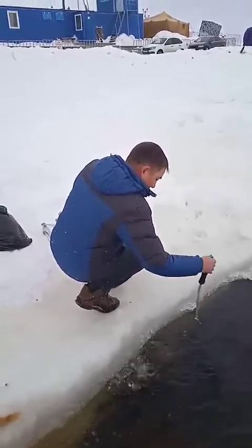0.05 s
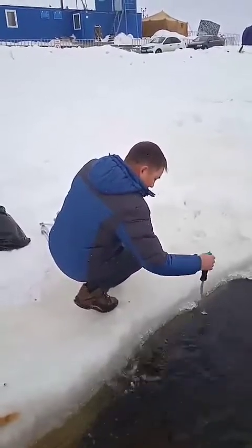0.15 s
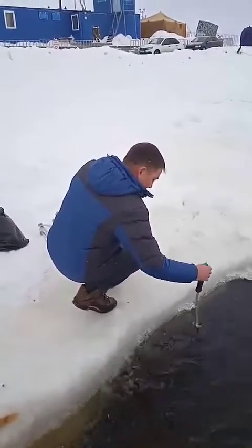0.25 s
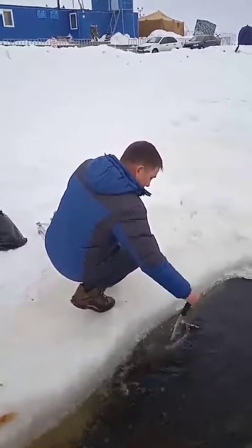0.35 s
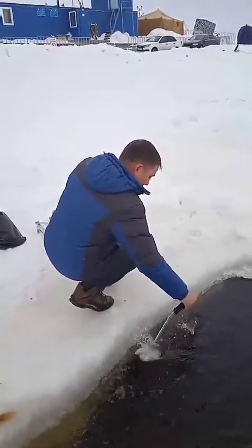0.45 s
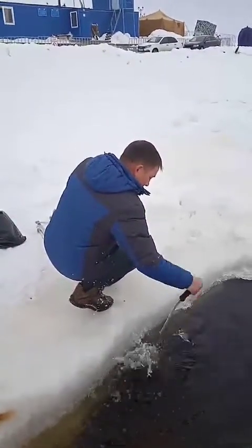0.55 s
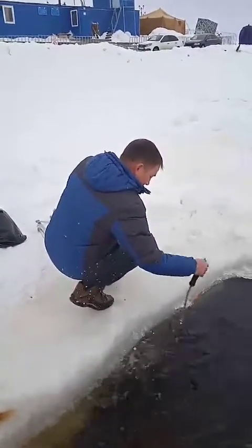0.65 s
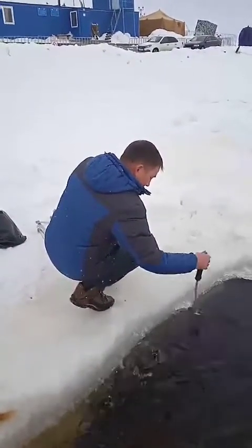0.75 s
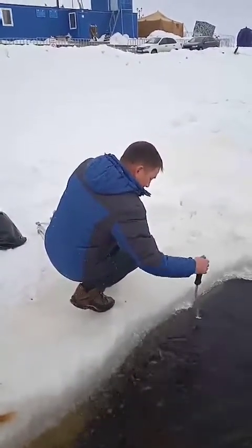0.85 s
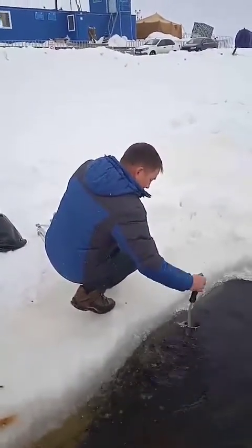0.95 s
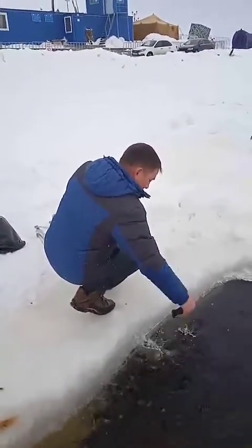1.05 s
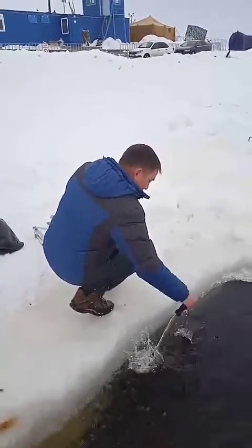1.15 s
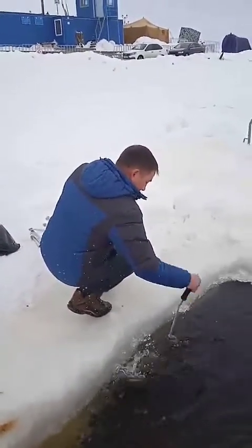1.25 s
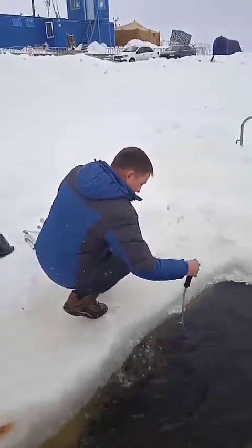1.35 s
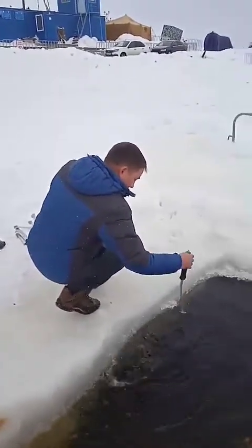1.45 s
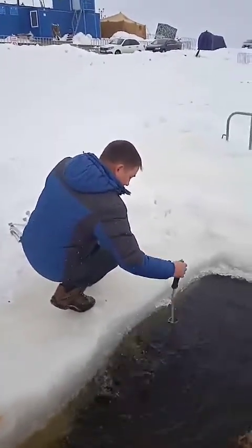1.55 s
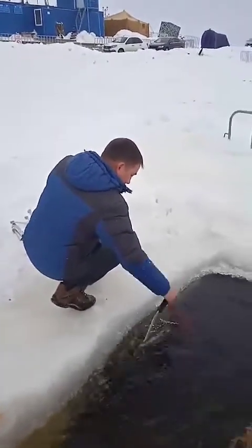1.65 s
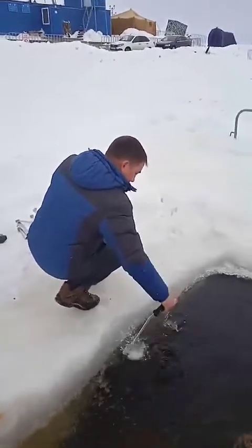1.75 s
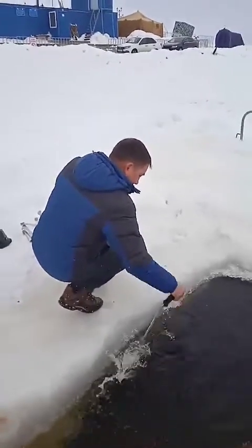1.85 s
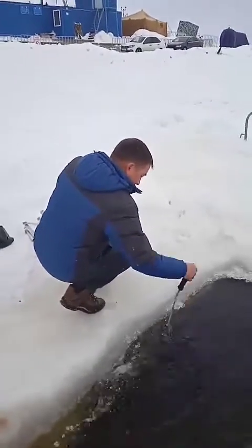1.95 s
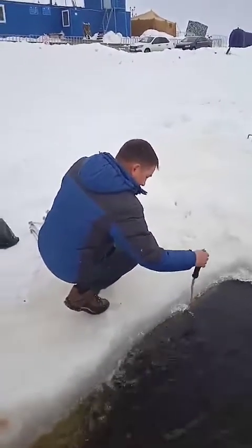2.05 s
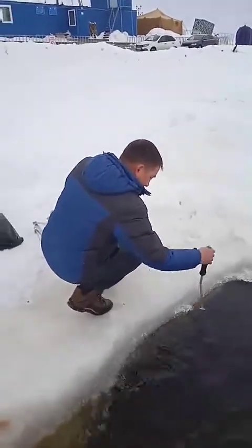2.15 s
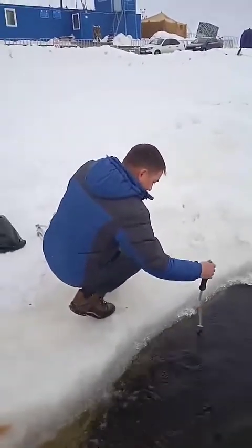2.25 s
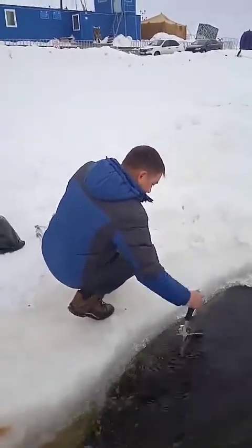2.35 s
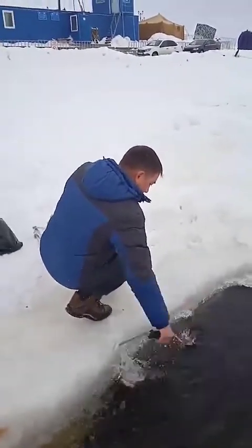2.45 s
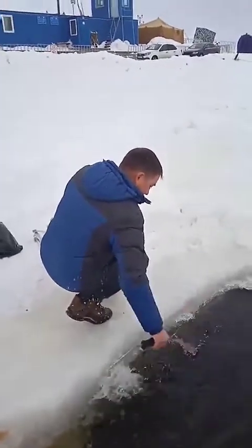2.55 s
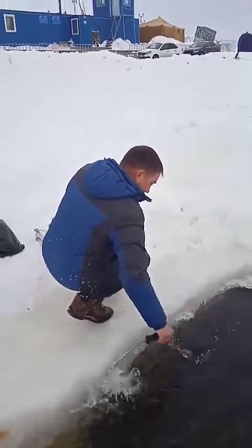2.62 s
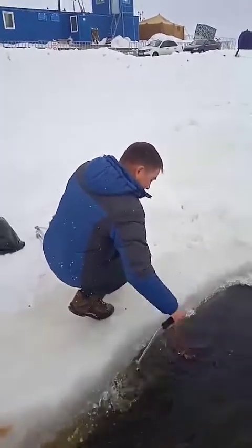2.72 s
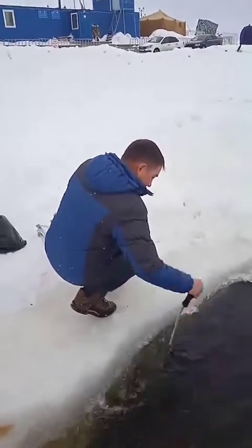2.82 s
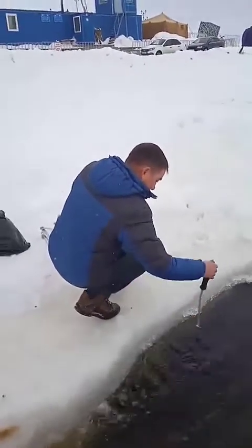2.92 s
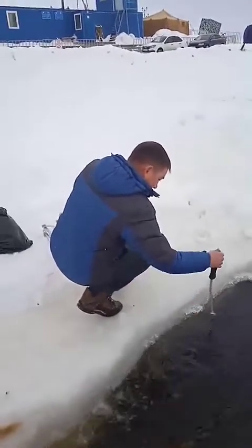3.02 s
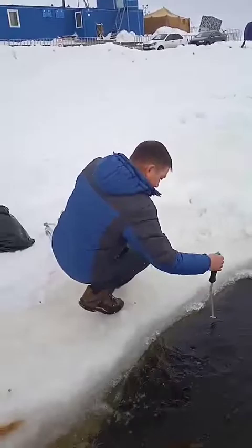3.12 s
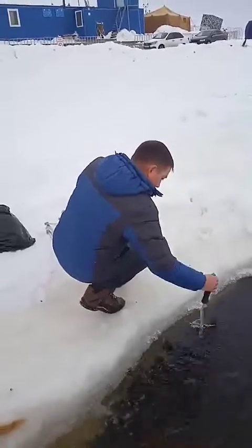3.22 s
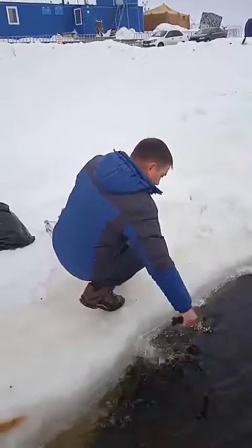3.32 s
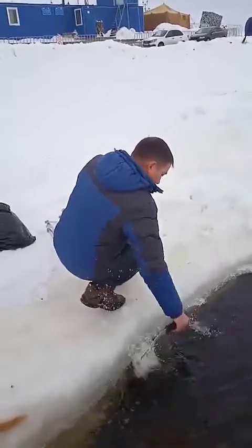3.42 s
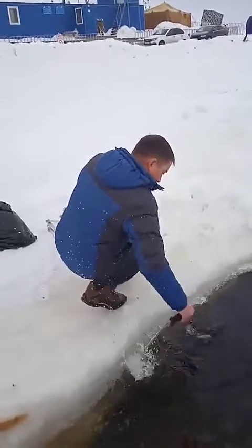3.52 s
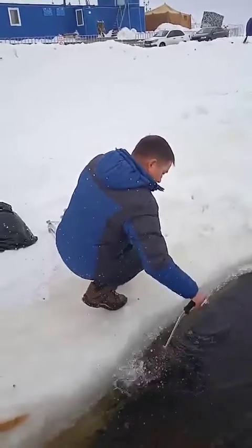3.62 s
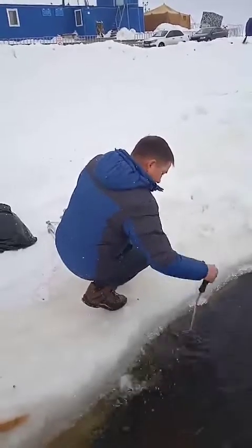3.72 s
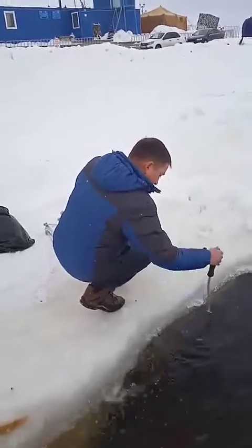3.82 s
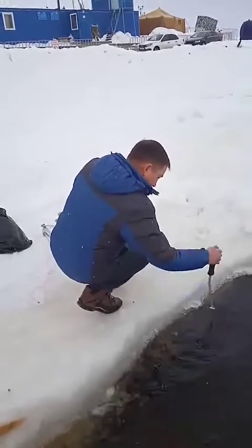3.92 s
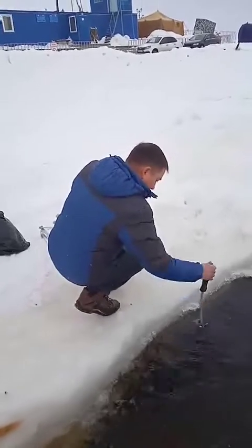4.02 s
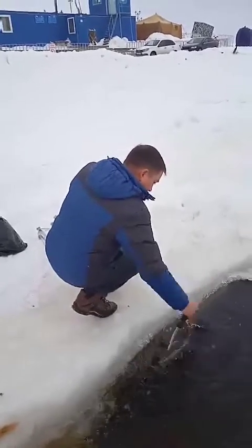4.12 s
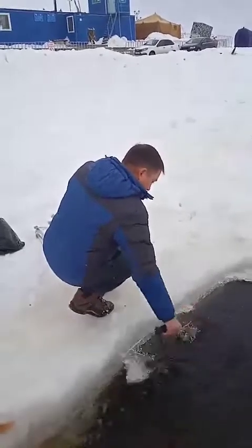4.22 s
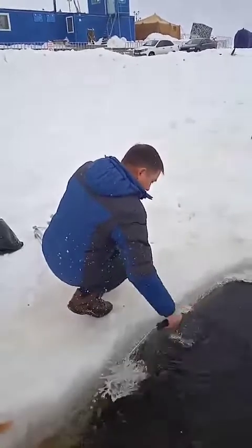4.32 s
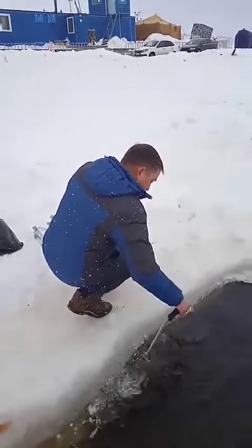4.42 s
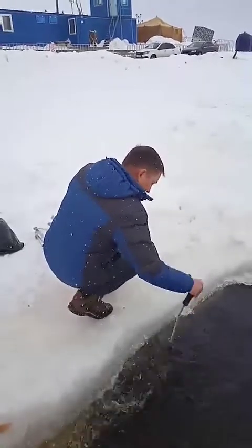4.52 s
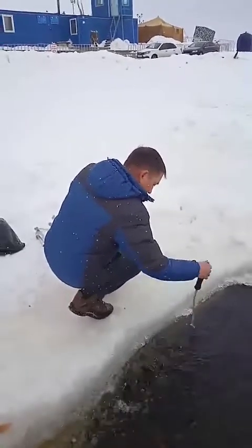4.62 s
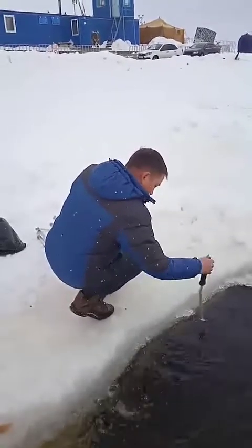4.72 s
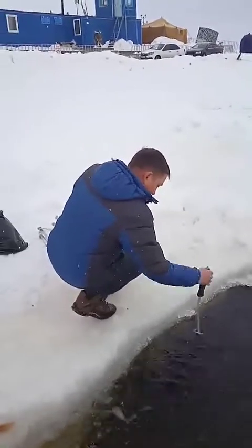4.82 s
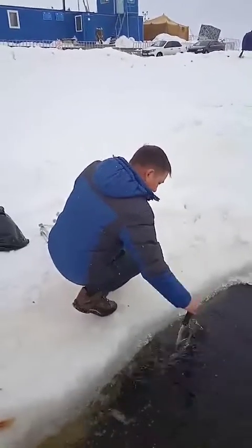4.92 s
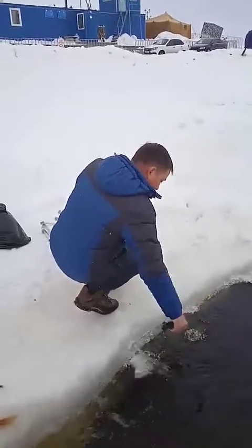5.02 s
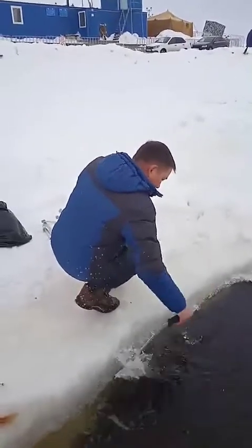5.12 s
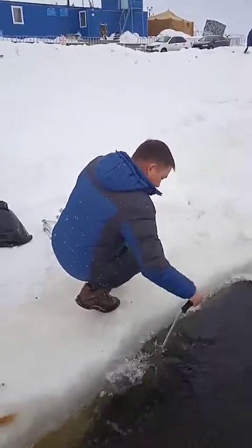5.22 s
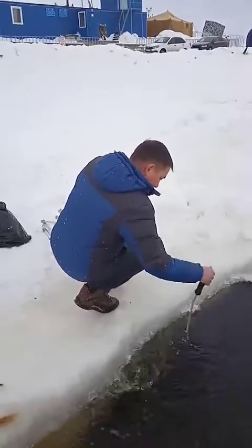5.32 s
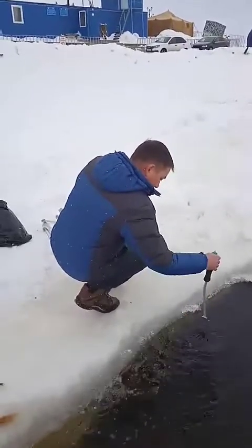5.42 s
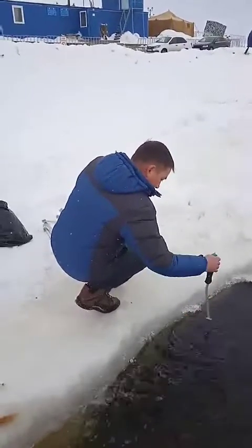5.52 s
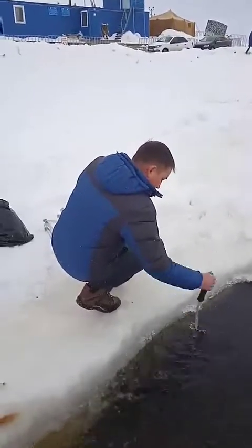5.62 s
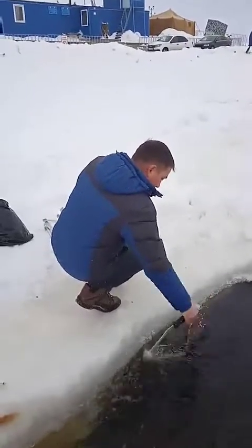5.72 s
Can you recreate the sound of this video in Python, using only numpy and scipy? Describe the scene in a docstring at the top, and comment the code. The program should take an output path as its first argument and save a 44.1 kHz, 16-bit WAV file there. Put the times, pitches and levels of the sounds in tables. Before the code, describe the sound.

Repeated short splashes and bubbling plops from a rod striking water, each followed by falling droplets, under growing wind rumble.

```python
"""Open water beside a snowy bank, one microphone out in the wind, a faint whir far off.
Spray is already pattering down when a metal rod whips through the water, the first of seven strokes.
Each slaps the surface and drags down a pocket of air, which pinches off and rings as a low, rising plop.
A third of a second later the thrown spray falls back as ticks and tiny ringing bubbles.
Toward the end the wind freshens and buffets the microphone harder."""
import sys
import numpy as np
from scipy import signal
from scipy.fft import rfft, irfft, next_fast_len
from scipy.io import wavfile
from scipy.ndimage import uniform_filter1d

SR = 44100
rng = np.random.default_rng(int(sys.argv[2]) if len(sys.argv) > 2 else 0)


def to_wav(s):
    """Save 16-bit WAV."""
    ch = np.atleast_2d(s).T  # columns
    pcm = np.round(np.clip(ch, -1, 1) * 32767)  # PCM
    wavfile.write(sys.argv[1], SR, pcm.astype(np.int16))


N = 254456
TIME = np.arange(N) / SR


# The bubble trapped by each stroke: (time [s], base pitch [Hz], climb [Hz/s], pitch ceiling [Hz],
# relative level [dB], swell [s], hold [s], decay [s])
TRAPPED_BUBBLES = [(0.4386, 232, 10040, 499, -5.5, 0.0058, 0.011, 0.007),
                   (1.0952, 232, 10700, 488, -11.5, 0.0021, 0.012, 0.0051),
                   (1.7357, 208.3, 7060, 484, -11, 0.0039, 0.023, 0.006),
                   (2.4826, 192, 6530, 349, -12, 0.0002, 0.012, 0.0089),
                   (3.369, 262, 5040, 346, -10.5, 0.00081, 0.012, 0.011),
                   (4.2080, 230.5, 6380, 440, -7.5, 0.0018, 0.021, 0.0051),
                   (5.0243, 225, 7100, 361, -11.5, 0.0035, 0.013, 0.0057)]

def plops(knee_s=0.0026, sag_hz=55, settle_s=0.0073, echo_db=-24, echo_delay_s=0.0132):
    """The big bubble swells into tone, climbs in pitch as it nears the surface, and dies."""
    out = np.zeros(N)
    for s, base_hz, climb, ceiling_hz, db, attack, hold, decay in TRAPPED_BUBBLES:
        age = since(s)
        sag = sag_hz * np.exp(-age / settle_s)  # the first swing is slower while the neck closes
        pitch = np.minimum(base_hz + climb * age, ceiling_hz) - sag
        swell = 1 - np.exp(-(age / attack) ** 1.3)
        past_hold = knee_s * np.logaddexp(0, (np.minimum(age, 1) - hold) / knee_s)
        tone = np.sin(2 * np.pi * np.cumsum(pitch * (age > 0)) / SR)
        out += from_db(db) * swell * np.exp(-past_hold / decay) * tone
    # a weak reflection from the nearby bank beats against the tail
    return out + from_db(echo_db) * np.interp(TIME - echo_delay_s, TIME, out)


# The air pocket shuts: (time [s], relative smack level [dB], neck pitch [Hz],
# relative ring level [dB], overtone gain [dB])
POCKET_CLOSURES = [(.4395, -69.5, 889, -65, -14), (1.097, -60, 915, -55.5, -1.5),
                   (1.735, -42, 889, -55, 3.5), (2.483, -35.5, 695, -46, -8.5),
                   (3.367, -32, 725, -59.5, -8), (4.208, -80, 722, -59.5, 3.5),
                   (5.0221, -32.5, 755, -47, -5.5)]
# Modes of its open neck: (multiple of the neck pitch [ratio], gain [dB])
PIPE_MODES = [(1, 21), (1.78, 15), (2.4, 11)]

def necks(decay_s=0.0077):
    """The neck of the pocket rings briefly, like a short pipe, as it shuts."""
    out = np.zeros(N)
    for s, _, hz, db, overtone_db in POCKET_CLOSURES:
        for k, (multiple, mode_db) in enumerate(PIPE_MODES):
            is_overtone = k > 0
            pitch = hz * multiple * (1 + is_overtone * rng.normal(0, 0.025))
            gain = from_db(db + mode_db + overtone_db * is_overtone)
            out += gain * burst(s, 0.0011, decay_s) * np.sin(2 * np.pi * pitch * since(s))
    return out


# The rod cuts in: (time [s], relative slap level [dB], relative spray level [dB], spray decay [s],
# spray flight [s], relative level of the returning shower [dB])
ROD_STROKES = [(0.4282, -47.5, -56, 0.047, 0.3, -64), (1.083, -51, -51.5, 0.038, .32, -62),
               (1.727, -40.5, -57.5, 0.08, .29, -62), (2.4669, -42, -58, 0.078, 0.33, -56.5),
               (3.3478, -48, -55.5, 0.049, .345, -59.5), (4.1965, -48, -57, 0.053, 0.3, -60.5),
               (5.0048, -53, -48.5, 0.033, 0.35, -59)]
# Tone of the splash at the microphone: (frequency [Hz], relative level [dB])
SPLASH_SPECTRUM = [(200, -5), (600, 3), (1100, -9), (1600, -2), (2500, -2.5), (3500, -18.5), (4600, -9.5),
                   (6800, -8), (8300, -23.5), (11000, -23), (13500, -24.5), (15400, -10.5), (16200, -12.5)]

def splashes(skim_s=0.035, slap_decay_s=0.012, smack_decay_s=0.0052, push_db=-28, push_hz=125):
    """The rod skims, slaps, shoves water aside and throws a sheet of spray; the pocket smacks shut."""
    skim, slap, sheet, push = np.zeros((4, N))
    for s, slap_db, spray_db, spray_decay, *_ in ROD_STROKES:
        skim += from_db(slap_db - 22) * np.exp(-np.minimum(abs(TIME - s), 1) / skim_s)
        slap += from_db(slap_db) * burst(s, 0.0013, slap_decay_s)
        sheet += from_db(spray_db + 8) * burst(s, 0.0064, spray_decay)
        push += burst(s, 0.00049, 0.014) * np.sin(2 * np.pi * push_hz * since(s))
    smack = sum(from_db(db + 1.5) * burst(s, 0.0014, smack_decay_s) for s, db, *_ in POCKET_CLOSURES)
    spray = 0.7 * droplets(per_s=7000, spread_db=3) + 0.85 * fizz(per_s=2000, spread_db=3.5, cycles=40)
    crackle = droplets(per_s=12000, spread_db=2.5)
    hiss = colour((skim + slap + smack) * crackle + sheet * spray, SPLASH_SPECTRUM)
    return hiss - from_db(push_db) * push


# Small bubbles ring, trapped by the biggest drops and by the rod's splash:
# (time [s], pitch [Hz], relative level [dB], time to fade by 60 dB [s])
SMALL_BUBBLES = [(0.148, 4430, -54, 0.046), (.292, 6360, -49.5, 0.026), (0.614, 15800, -44, 0.0071),
                 (0.649, 1396, -39, 0.038), (0.729, 2690, -46, 0.014), (1.374, 1700, -43, 0.028),
                 (1.393, 1940, -44.5, 0.023), (1.433, 6160, -45, 0.016), (1.51, 5500, -57, 0.017),
                 (1.654, 4040, -49, 0.018), (1.667, 2220, -39.5, 0.0042), (1.729, 1790, -31.5, 0.026),
                 (1.899, 6400, -44.5, .016), (2.058, 2092, -48, 0.024), (2.857, 1414, -39.5, 0.049),
                 (2.972, 5870, -38, 0.007), (3.296, 6270, -63, 0.028), (3.701, 1810, -37, 0.038),
                 (3.754, 2300, -51.5, 0.057), (3.813, 4270, -45.5, 0.026), (3.899, 5400, -53, 0.012),
                 (4.031, 6000, -47, 0.017), (4.145, 6030, -54.5, 0.022), (4.478, 1320, -50, 0.082),
                 (4.501, 2590, -45.5, 0.045), (4.594, 4170, -40.5, 0.013), (5.182, 5630, -47.5, 0.023),
                 (5.303, 2200, -46, 0.025), (5.348, 5160, -43.5, 0.061), (5.647, 5530, -44, 0.022)]

def small_bubbles(rise=0.16, bubble_db=-2, spatter_db=-3, top_hz=15900):
    """Each small bubble chirps upward, with a spatter of water in a band around its pitch."""
    out = np.zeros(N + SR)
    age = np.arange(SR // 10) / SR
    for s, hz, db, t60 in SMALL_BUBBLES + lesser_drops():
        envelope = from_db(-60 * age / t60) * (1 - np.exp(-age / 0.0005))
        pitch = np.minimum(hz * (1 + rise * age / t60), top_hz)
        chirp = from_db(bubble_db) * np.sin(2 * np.pi * np.cumsum(pitch) / SR)
        band = signal.butter(2, [hz * 0.82, min(hz * 1.2, 0.45 * SR)], "band", fs=SR, output="sos")
        noise = rms_one(signal.sosfilt(band, rng.standard_normal(len(age))))
        spatter = from_db(spatter_db) * np.sqrt(hz / top_hz) * noise  # larger bubbles ring more cleanly
        start = int(abs(s) * SR)
        out[start:start + len(age)] += from_db(db) * envelope * (chirp + spatter)
    return out[:N]


def lesser_drops(count=5, scatter_s=0.16, low_hz=1900, high_hz=6740, t60_s=0.013):
    """A few chance drops trap bubbles around the thick of each shower; rows as in SMALL_BUBBLES."""
    rows = []
    for s, db in showers():
        chances = rng.standard_normal((count, 2)).clip(-2, 2)
        for (late, soft), small in zip(chances, rng.random(count)):
            hz = low_hz * (high_hz / low_hz) ** small
            rows.append((s + scatter_s * late, hz, db + 8 - 0.5 * soft, t60_s))
    return rows


# Tone of fine spray landing on open water: (frequency [Hz], relative level [dB])
PATTER_SPECTRUM = [(500, -17.5), (1100, 1), (1800, 0), (2600, 1.5), (3500, -12.5), (4700, -2.5),
                   (6800, -2.5), (8300, -23.5), (11000, -18), (13700, -34.5), (15400, -1.5), (16200, -11)]

def patter(tick_db=-4, bubble_db=-1, merge_db=-60, speck_db=-84):
    """Fine spray lands as ticks and tiny bubbles, merging into a wash where it falls thickest."""
    ticks = from_db(tick_db) * droplets(per_s=550, spread_db=5)
    bubbles = from_db(bubble_db) * fizz(per_s=400, spread_db=3.8, cycles=55)
    wash = fizz(per_s=6000, spread_db=2.5, cycles=25)
    clumps = rms_one(from_db(2.5 * drift(50)))
    fall = spray_fall()
    merged = fall ** 2 / (fall ** 2 + from_db(merge_db) ** 2)
    landing = np.sqrt(1 - merged) * (ticks + bubbles) + np.sqrt(merged) * wash
    # stray specks of water tick on the surface all the while
    specks = from_db(speck_db) * highpass(droplets(per_s=54, spread_db=0.5), hz=4000)
    return colour(fall * clumps * landing + specks, PATTER_SPECTRUM)


def spray_fall(rise_db_per_s=59, fall_db_per_s=109, straggler_db=-13.5, trail_db_per_s=22, lead_s=0.3):
    """Strength of the falling spray: each shower builds, thins out and leaves a few stragglers."""
    power = np.zeros(N)
    for s, db in showers():
        building_db = db - rise_db_per_s * np.maximum(s - TIME, 0)
        bulk = from_db(building_db - fall_db_per_s * since(s))
        stragglers = from_db(building_db + straggler_db - trail_db_per_s * since(s))
        power += (bulk ** 2 + stragglers ** 2) * (TIME > s - lead_s)
    return np.sqrt(power)


# Spray already coming down at the start: (time [s], relative level [dB])
OPENING_SHOWER = (0.096, -67)

def showers():
    """Time and level of each shower at its thickest; thrown spray lands one flight after its stroke."""
    return [OPENING_SHOWER] + [(s + flight, db) for s, *_, flight, db in ROD_STROKES]


# Wind at the microphone, freshening gust by gust: (time [s], level before flutter [dB])
WIND_STRENGTH = [(0, -60), (.38, -58), (.57, -77.5), (.74, -54), (.9, -79.5), (1.07, -41), (1.28, -70),
                 (1.66, -50), (1.95, -76.5), (2.32, -49.5), (2.47, -46.5), (2.62, -67), (3.0, -57),
                 (3.3, -55.5), (3.42, -44), (3.72, -58), (3.92, -45), (4.14, -56), (4.3, -39), (4.48, -50),
                 (4.58, -41.5), (4.72, -44), (4.83, -36.5), (4.91, -46.5), (5.15, -36.5), (5.5, -34.5),
                 (5.545, -50.5), (5.735, -30), (5.77, -45.5)]
# A light breeze only rumbles: (frequency [Hz], relative level [dB])
BREEZE_SPECTRUM = [(20, -34.5), (45, -10.5), (85, 8.5), (150, 3), (260, -15), (420, -25.5), (800, -51),
                   (3000, -54.5)]
# A hard gust sheds smaller eddies and flutters higher: (frequency [Hz], relative level [dB])
GUST_SPECTRUM = [(20, -22), (45, -8.5), (90, 4), (190, 6), (310, -6), (440, -14), (700, -24.5),
                 (1300, -50.5), (3000, -81.5)]

def wind(lumps_db=5, gust_db=-44, flutter_db=5, flutter_hz=16):
    """Lumpy turbulence right at the microphone port, brighter the harder it blows."""
    force = level(WIND_STRENGTH) * from_db(flutter_db * np.clip(drift(flutter_hz), -2, 2))
    gust_share = force ** 2 / (force ** 2 + from_db(gust_db) ** 2)
    eddies = rng.standard_normal(N) * from_db(lumps_db * drift(35))
    flow = (1 - gust_share) * colour(eddies, BREEZE_SPECTRUM) + gust_share * colour(eddies, GUST_SPECTRUM)
    running_rms = np.sqrt(uniform_filter1d(flow ** 2, size=SR // 22) + 1e-12)
    return force * flow / running_rms


# The strongest eddies: (time [s], relative level [dB], pitch [Hz])
EDDY_THUMPS = [(0.995, -38, 189), (1.516, -33.5, 186), (1.666, -28.5, 140), (2.412, -32.5, 165),
               (2.75, -34, 120), (3.016, -31.5, 118), (3.159, -35, 94), (3.434, -26, 148),
               (3.925, -27.5, 160), (4.048, -34, 195), (4.517, -24, 190), (4.573, -23.5, 168),
               (4.604, -27, 335), (4.877, -27, 220), (4.981, -19, 210), (5.109, -21, 286),
               (5.142, -16.5, 372), (5.434, -18, 350), (5.617, -28.5, 337), (5.73, -16.5, 328)]

def buffets(gain_db=4, attack_s=0.0008, decay_cycles=0.8):
    """An eddy thumps the microphone with one quick, heavily damped swing of pressure."""
    swings = np.zeros(N)
    for s, db, hz in EDDY_THUMPS:
        swings += from_db(db) * burst(s, attack_s, decay_cycles / hz) * np.sin(2 * np.pi * hz * since(s))
    return from_db(gain_db) * highpass(swings, hz=70)


# Tone of the open air over the water: (frequency [Hz], relative level [dB])
AIR_SPECTRUM = [(40, 0), (200, -0.5), (450, 6.5), (750, 7.5), (1050, 0), (1450, -7), (2000, -7),
                (3500, -21.5), (5500, -9.5), (9000, -34), (13500, -34), (15400, -17)]

def air(steady_db=-71, wash_db=-7):
    """Faint outdoor background, with the soft wash of stirred water as each shower lands."""
    strength = np.hypot(from_db(steady_db), from_db(wash_db) * spray_fall())
    return strength * colour(rng.standard_normal(N), AIR_SPECTRUM)


# The distant whir as it reaches the bank: (time [s], level [dB])
WHIR_STRENGTH = [(0, -86), (1.6, -76), (2.0, -71.5), (3.15, -67), (3.3, -87.5), (4.3, -73.5), (5.77, -86)]
# Its narrow band: (frequency [Hz], relative level [dB])
WHIR_SPECTRUM = [(800, -32.5), (1130, -14.5), (1330, -2), (1650, -10.5), (1900, -16.5), (2600, -35)]

def whir():
    """Far off, a faint band of noise swells and fades."""
    return level(WHIR_STRENGTH) * colour(rng.standard_normal(N), WHIR_SPECTRUM)


def droplets(per_s, spread_db):
    """Random ticks of uneven size, rms 1."""
    sizes = from_db(spread_db * np.minimum(rng.exponential(1, N), 4))
    signs = rng.choice([-1, 1], N)
    return rms_one(sizes * signs * (rng.random(N) < per_s / SR))


def fizz(per_s, spread_db, cycles, count=28):
    """Tiny bubbles of many sizes, each fading by 60 dB over the given cycles; rms 1."""
    ticks = droplets(per_s, spread_db)
    size_class = rng.integers(0, count, N)
    pitches = np.geomspace(1200, 15500, count) * rng.uniform(0.96, 1.04, count)
    out = np.zeros(N)
    for k, hz in enumerate(pitches):
        out += np.sqrt(hz) * rms_one(ring(ticks * (size_class == k), hz, cycles / hz))
    return rms_one(out)


def ring(clicks, hz, t60):
    """Each click sets a decaying sine ringing."""
    radius, angle = from_db(-60 / (t60 * SR)), 2 * np.pi * hz / SR
    feedback = [1, -2 * radius * np.cos(angle), radius * radius]
    return signal.lfilter([0, np.sin(angle)], feedback, clicks + 1e-18)


def colour(x, spectrum):
    """Causal (minimum-phase) filter with the given spectrum; white noise keeps its power."""
    size = 2 * next_fast_len(N // 2 + SR // 4)
    hz, db = np.transpose(spectrum)
    freqs = np.maximum(np.fft.rfftfreq(size, 1 / SR), 1)
    gain = rms_one(from_db(np.interp(np.log(freqs), np.log(hz), db)))
    cepstrum = irfft(np.log(gain))
    cepstrum[1:size // 2] *= 2
    cepstrum[size // 2 + 1:] = 0
    return irfft(rfft(x, size) * np.exp(rfft(cepstrum)), size)[:N]


def highpass(x, hz):
    """Second-order bass cut."""
    return signal.sosfilt(signal.butter(2, hz, "high", fs=SR, output="sos"), x)


def drift(hz):
    """Smooth random wander, rms 1."""
    pole = np.exp(-2 * np.pi * hz / SR)
    return rms_one(signal.lfilter([1], [1, -2 * pole, pole * pole], rng.standard_normal(N + SR))[SR:])


def burst(s, attack_s, decay_s):
    """Envelope that swells quickly and dies away."""
    age = np.minimum(since(s), 1)
    return (1 - np.exp(-age / attack_s)) * np.exp(-age / decay_s)


def since(s):
    """Seconds since a moment, zero before it."""
    return np.maximum(TIME - s, 0)


def level(rows):
    """Gain over time from rows of (time [s], level [dB])."""
    return from_db(np.interp(TIME, *np.transpose(rows)))


def from_db(db):
    """Decibels to gain."""
    return 10 ** (np.asarray(db) / 20)


def rms_one(x):
    """Scale to unit rms."""
    return x / np.sqrt(np.mean(x ** 2) + 1e-20)


def scene():
    """Water, wind and background in mono; the snow on the bank swallows the reverberation."""
    water = plops() + splashes() + necks() + small_bubbles() + patter()
    water = highpass(water, hz=85)  # a small source at a free surface radiates hardly any deep bass
    return (water + wind() + buffets() + air() + whir())[None, :]


def record(dry, rumble_cut_hz=18, top_cut_hz=16150):
    """The microphone sheds deep rumble; the top is cut steeply."""
    top_cut = signal.ellip(10, 0.1, 80, top_cut_hz, fs=SR, output="sos")
    return signal.sosfilt(top_cut, highpass(dry, rumble_cut_hz))


dry = scene()
out = record(dry)
to_wav(out)
```